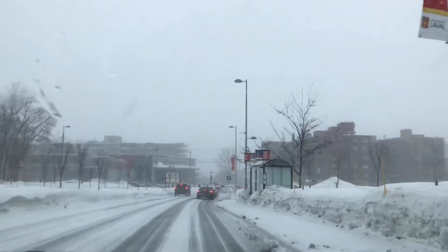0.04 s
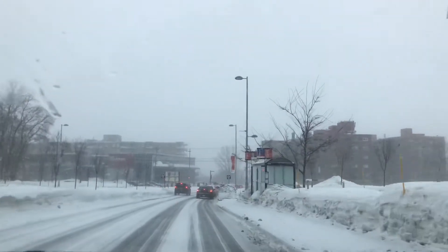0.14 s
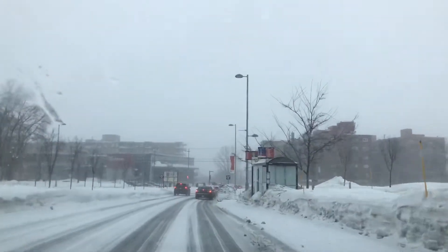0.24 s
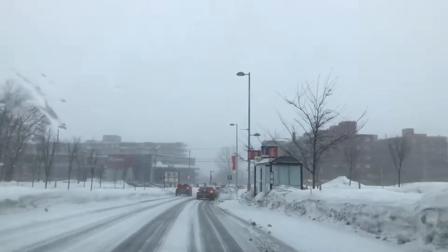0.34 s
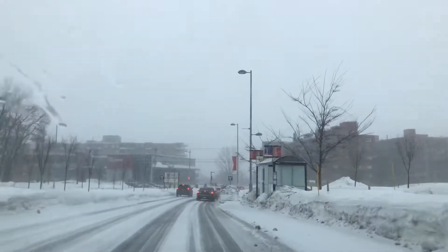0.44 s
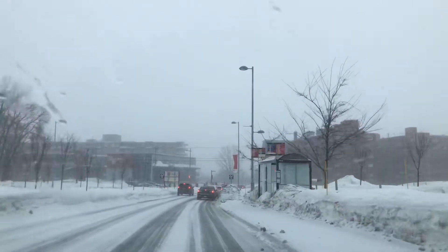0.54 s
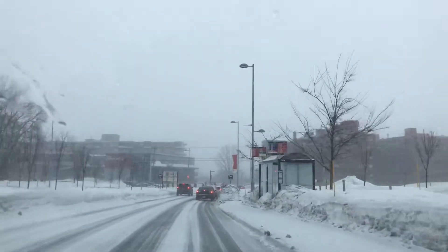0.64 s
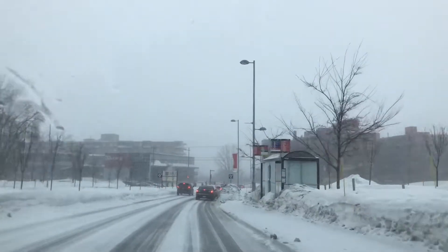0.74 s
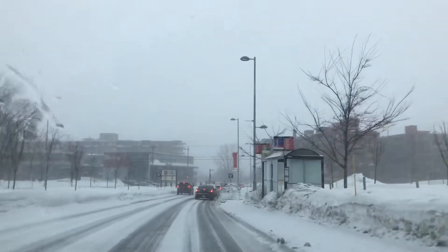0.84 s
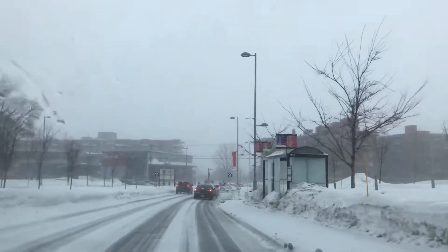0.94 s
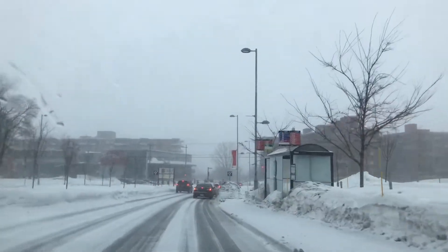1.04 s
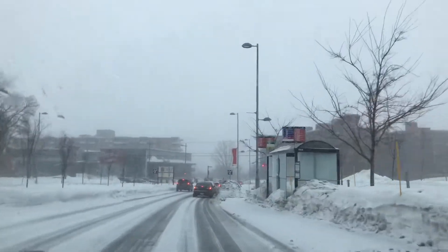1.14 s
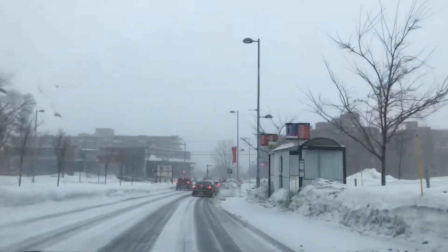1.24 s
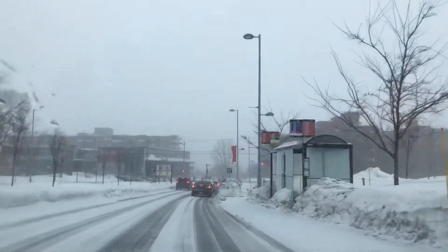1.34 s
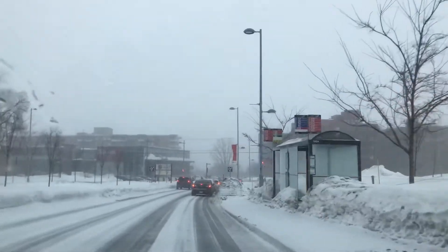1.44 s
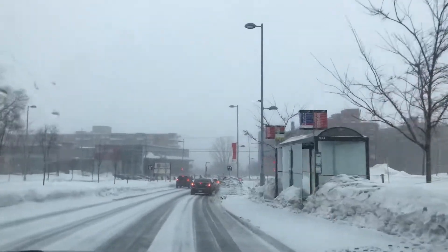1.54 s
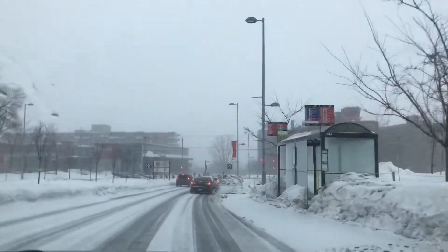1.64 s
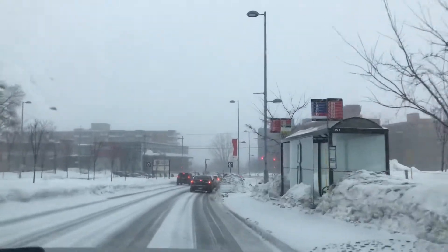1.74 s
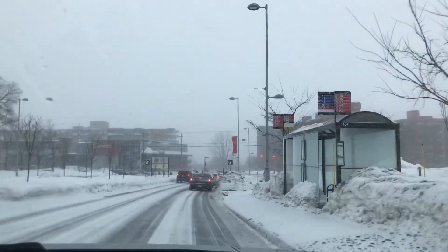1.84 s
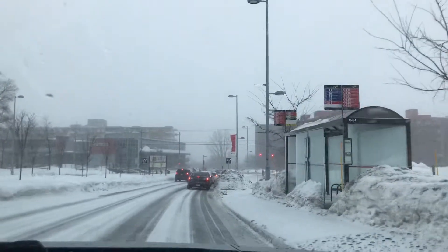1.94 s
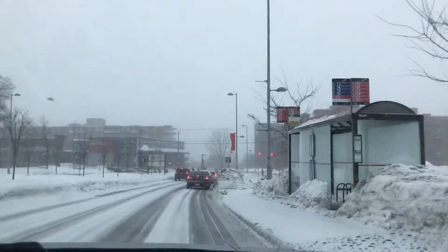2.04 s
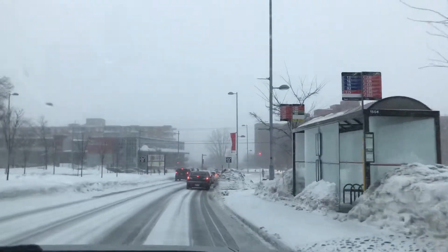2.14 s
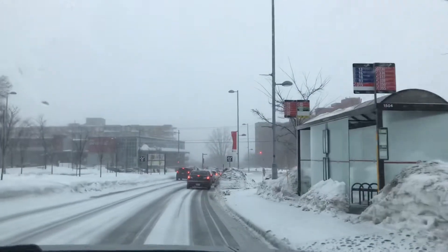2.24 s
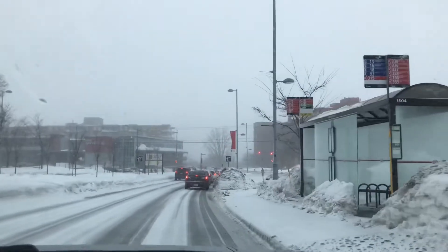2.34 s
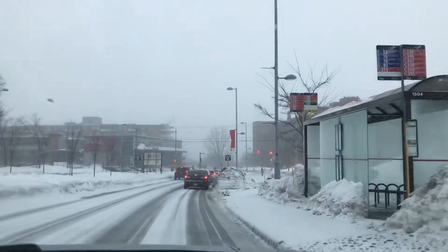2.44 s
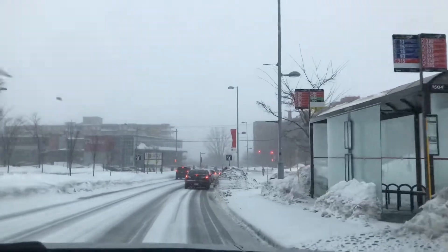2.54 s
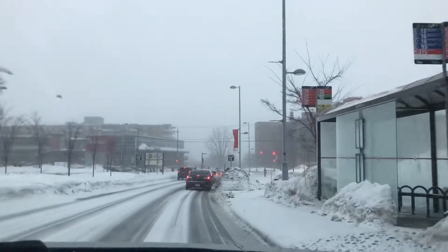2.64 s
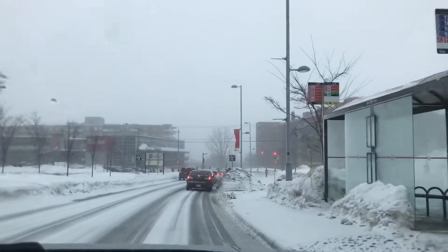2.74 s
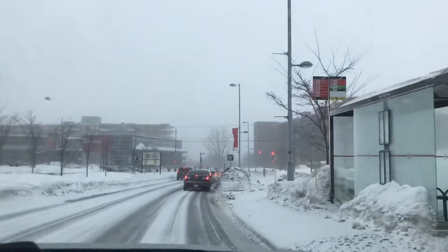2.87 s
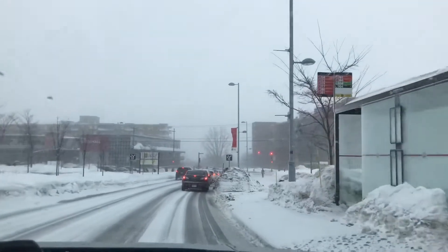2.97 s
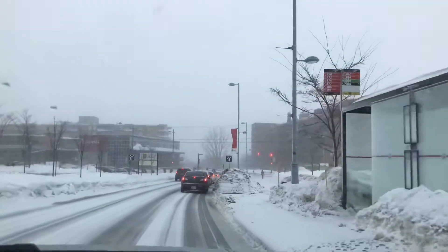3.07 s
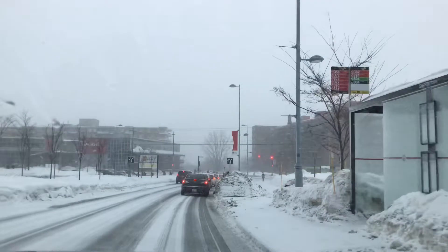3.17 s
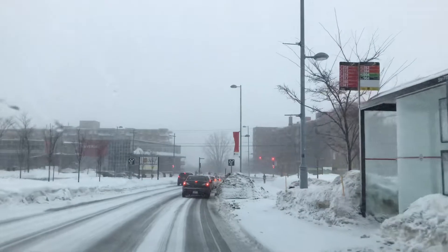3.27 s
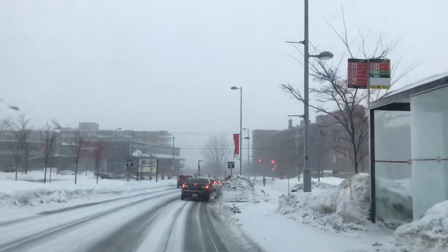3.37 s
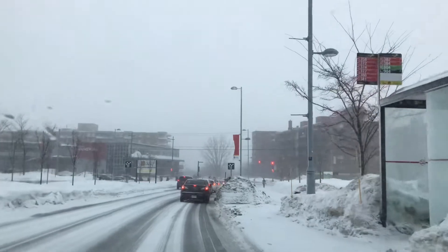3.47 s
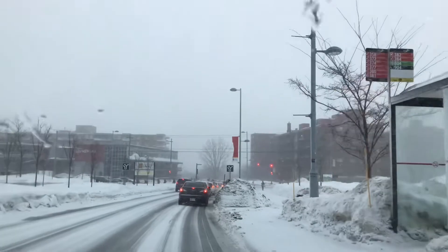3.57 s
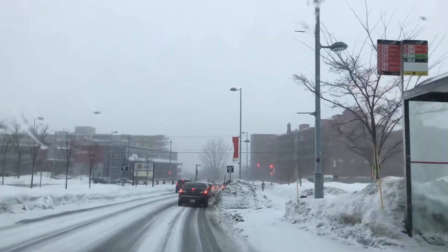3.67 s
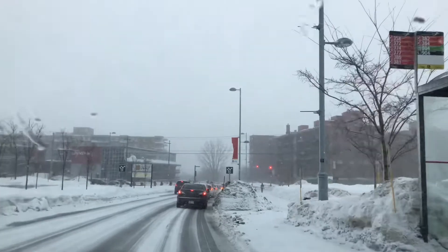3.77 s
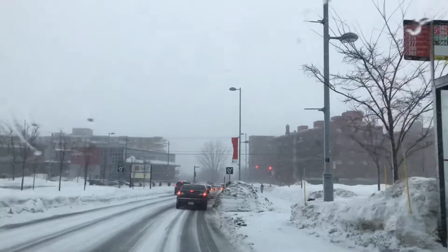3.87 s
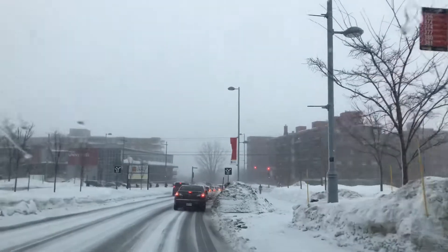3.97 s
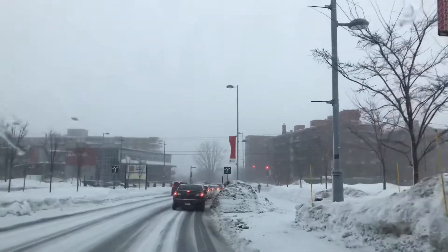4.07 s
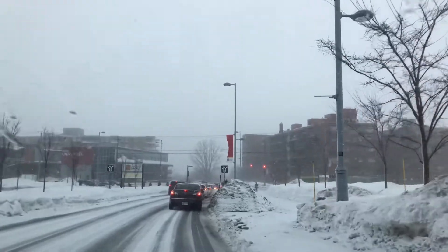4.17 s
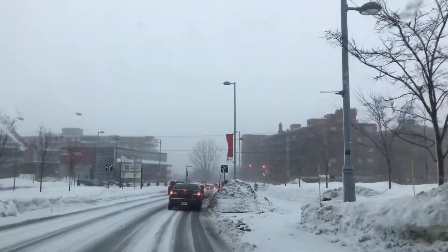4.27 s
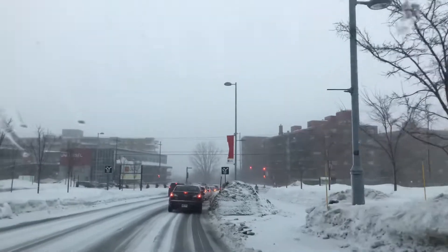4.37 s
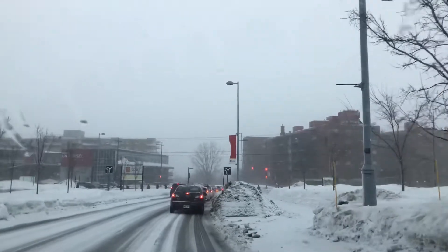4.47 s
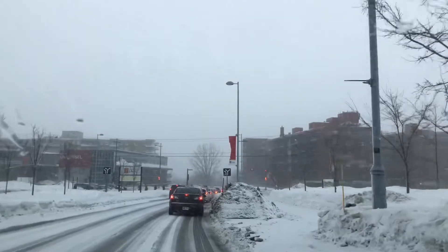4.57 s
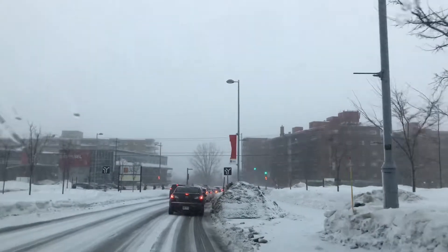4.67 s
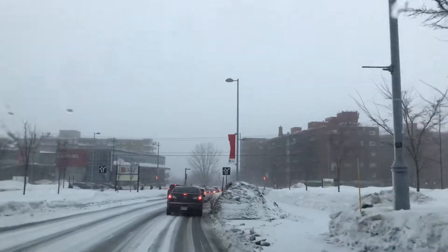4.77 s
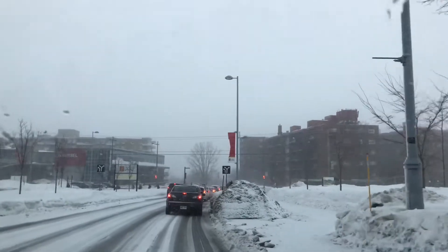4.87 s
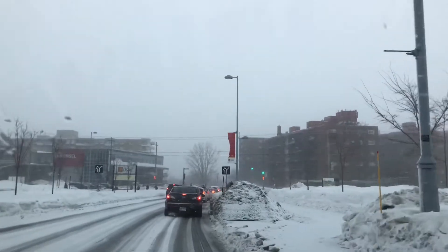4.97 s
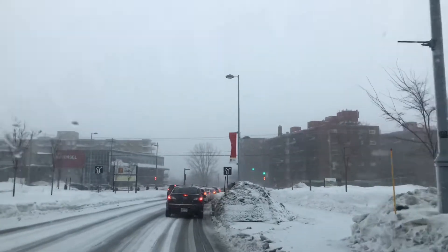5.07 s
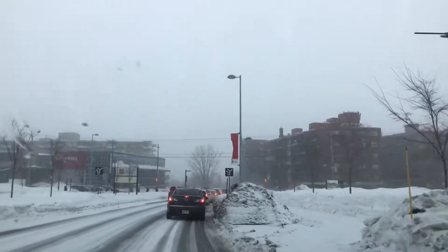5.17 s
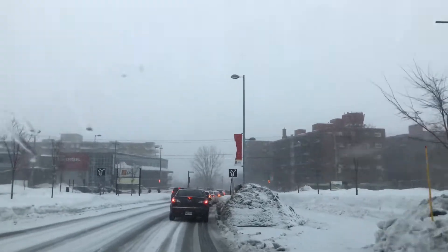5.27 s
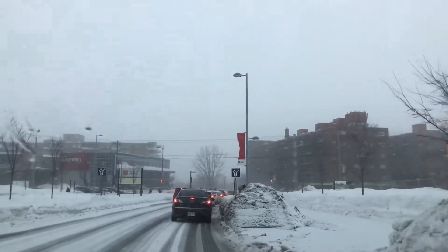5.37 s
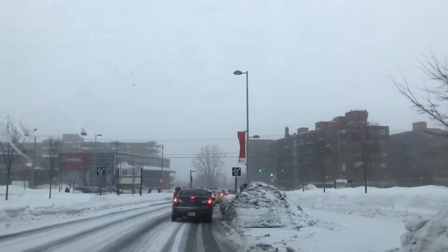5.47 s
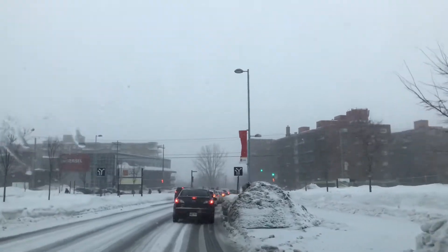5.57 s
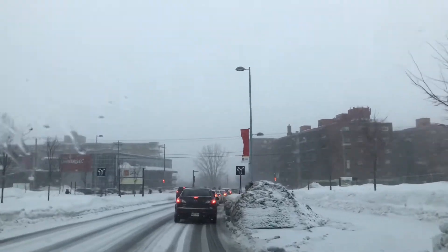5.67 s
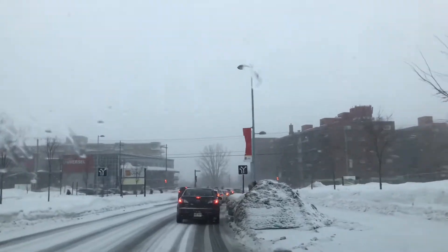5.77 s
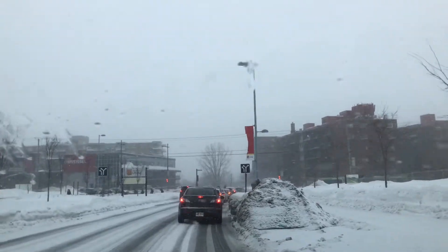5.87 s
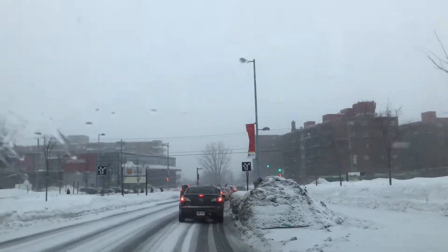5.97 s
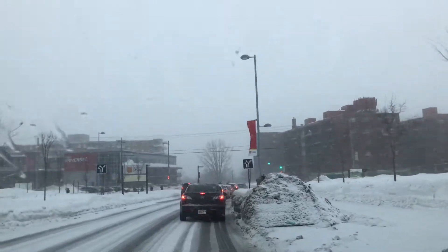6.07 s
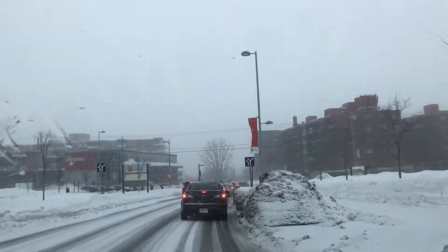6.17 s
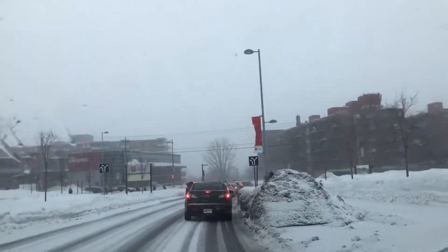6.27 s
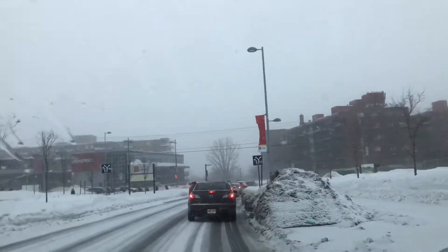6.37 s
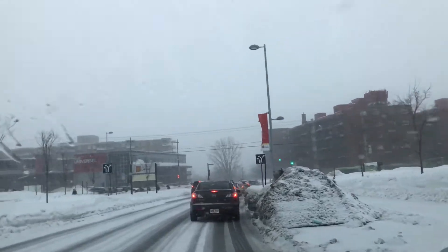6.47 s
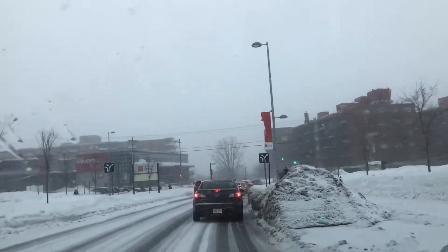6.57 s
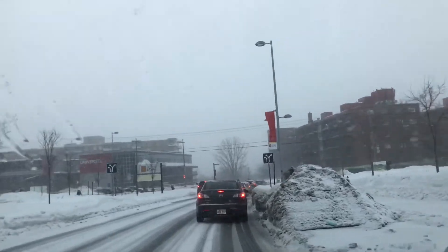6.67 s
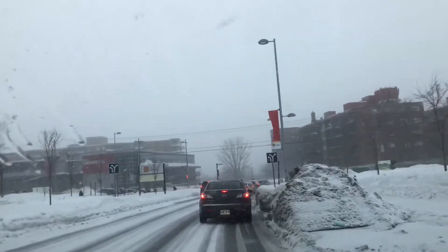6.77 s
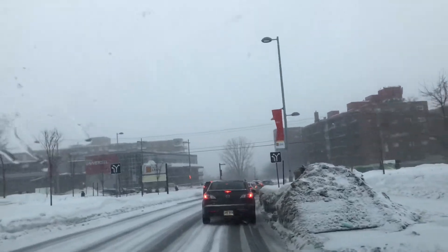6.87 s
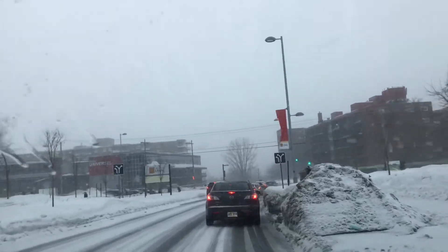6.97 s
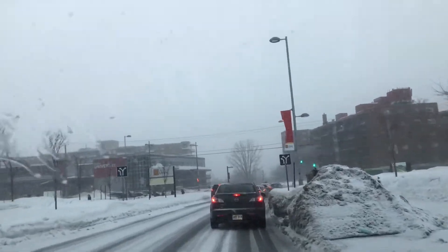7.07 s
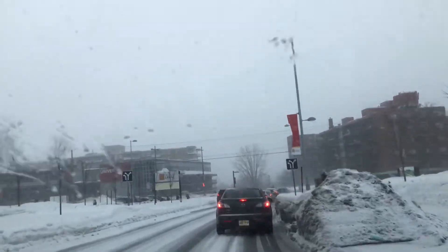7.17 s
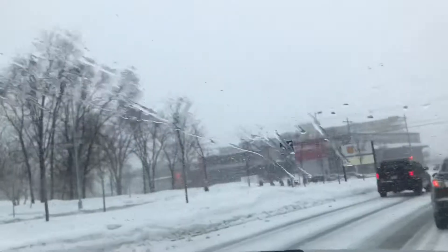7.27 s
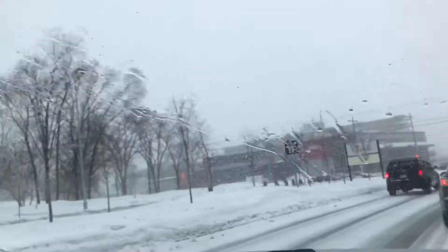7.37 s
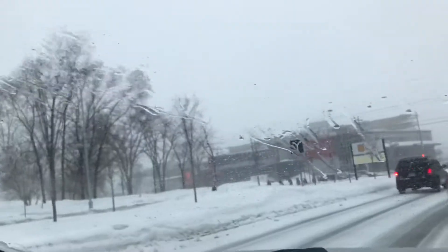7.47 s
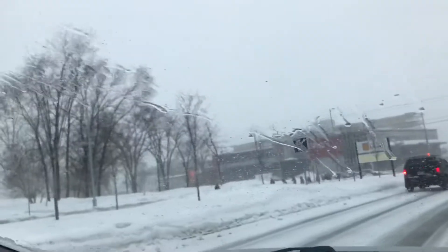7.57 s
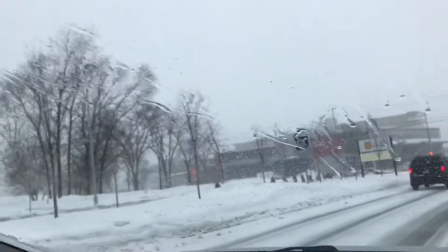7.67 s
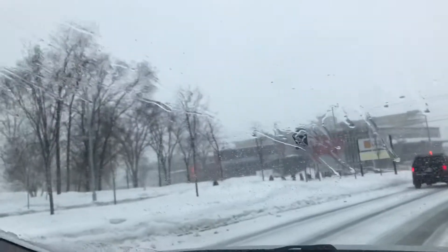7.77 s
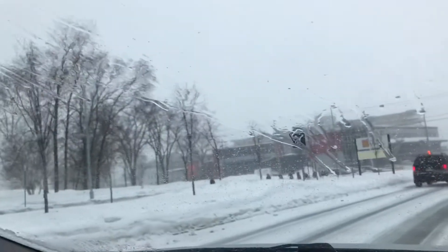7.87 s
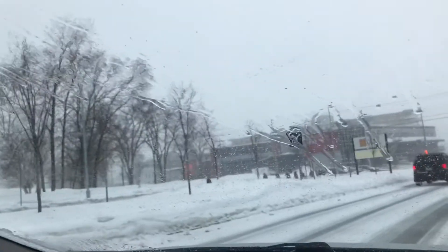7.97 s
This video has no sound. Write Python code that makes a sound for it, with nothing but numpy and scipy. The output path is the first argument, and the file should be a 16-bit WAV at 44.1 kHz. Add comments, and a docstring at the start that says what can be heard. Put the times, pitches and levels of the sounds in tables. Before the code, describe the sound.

Inside a closed car on a snowy street, close and dry, lasting about 8 seconds. From 0 s deep tyre rumble and cabin boom fill the low end, with a low engine hum, muted road roar, thin slush hiss and very faint vent air. From 0.2 s the turn-signal relay clicks about every 0.35 s, alternating a hard bright tick and softer tock. Dull low bumps shake the body, mostly between 1 and 4.5 s, as the rumble eases with slowing. Tiny scuffs dot the cabin; soft sleeve-like swishes come around 2.8-3.5 s and 5.2-5.6 s, then a fainter one until 6.1 s. At 7.3 s everything dips for an instant and breaks abruptly to creeping: low engine hum stands out over lighter road noise. Two clicks follow by 7.7 s, with brief scuffs and faint, wavering high squeaks around 7.7 and 7.95 s.

```python
"""A car rolls along a snowy street, slowing down: shaped noises make the tyres rumble and boom,
low sine tones make the engine, and a faint noise hisses for the air vents. From the start the turn-signal
relay ticks and tocks: struck, ringing resonances. Noise bursts scuff now and then; from about 3 s, longer
ones swish, perhaps a sleeve at the wheel. After an abrupt break at 7.3 s the car creeps:
the engine's hum stands out over lighter road noise, with faint squeaks from wavering tones."""
import sys
import numpy as np
from scipy import signal
from scipy.fft import rfft, irfft
from scipy.io import wavfile
from scipy.ndimage import uniform_filter1d, map_coordinates

SR = 44100
rng = np.random.default_rng(int(sys.argv[2]) if len(sys.argv) > 2 else 0)


def generate_wav(sig):
    """Save sig (samples, or channels by samples) to the path in sys.argv[1] as 16-bit PCM at SR."""
    pcm = np.round(np.clip(np.atleast_2d(sig).T, -1, 1) * 32767).astype(np.int16)
    wavfile.write(sys.argv[1], SR, pcm)


N = 353682
TIME = np.arange(N) / SR   # seconds

# body shaking on its springs: (frequency [Hz], relative level [dB per Hz])
SHAKE_SPECTRUM = [(20, -36.5), (30, -20), (40, 2), (52, 1), (62, 2.5), (72, 1), (84, -11.5), (110, -20)]
# low resonances of the cabin air: (frequency [Hz], width [Hz], relative level [dB])
BOOM_MODES = [(97.7, 14.2, 1), (112.1, 23.2, -3.5), (129.14, 16.5, 1.5), (157.2, 13.3, -5.5)]
# higher resonances of cabin air and tyre cavity: (frequency [Hz], width [Hz], relative level [dB])
CAVITY_MODES = [(195.4, 14.7, 1), (227.9, 6.3, 5), (256.9, 16.6, -4)]
# tread hum in the wheel wells: (frequency [Hz], width [Hz], relative level [dB])
TREAD_MODES = [(298.3, 34.5, -1.5), (322, 21, -1), (351.2, 28, -3), (399, 75, -12)]
# road roar under the tread: (frequency [Hz], relative level [dB per Hz])
ROAR_SPECTRUM = [(200, -16), (400, 0), (550, 1), (760, -3), (880, -1), (1100, -2), (1250, -4), (1400, -7.5),
                 (1750, -16), (2600, -32)]
# hiss of slush under the tyres: (frequency [Hz], relative level [dB per Hz])
SLUSH_SPECTRUM = [(900, -20.5), (1700, 1), (2150, -0.5), (2450, 1.5), (2900, -2.5), (4200, -9),
                  (5500, -16.5), (9000, -31.5)]
# the slush thins out: (time [s], hiss level [dB])
SLUSH_LEVEL = [(0, -62), (1.1, -69.5), (3.1, -68.5), (5.0, -67.5), (6.7, -69.5), (7.3, -67)]
# bumps in the packed snow: (time [s], body shake level [dB], cabin boom level [dB])
BUMPS = [(0.11, -36, -22.5), (0.55, -40, -25.5), (1.07, -19, -47), (1.4, -19.5, -36), (1.9, -21.5, -29.5),
         (2.12, -23, -43), (3.11, -24, -42), (3.28, -24, -43), (3.94, -22.5, -44), (4.42, -27, -28),
         (6.42, -37, -31), (6.6, -27, -34), (7.16, -22, -55)]
# cabin and wheel wells hum up for a stretch: (time [s], level [dB], half length [s], frequency [Hz])
HUMS = [(0.496, -32, 0.46, 131), (1.9, -30, .25, 128), (1.3, -50.5, .6, 342.6), (2.797, -34, 0.36, 135.4),
        (2.896, -54, .3, 341.8), (6.048, -34, 0.52, 129.2)]


def tyres():
    """Packed snow shakes the body, booms and hums in the cabin and roars under the tread."""
    bump_half_s = 0.028
    jolts = sum(from_db(shake_db) * swell(s, bump_half_s) for s, shake_db, _ in BUMPS)
    thuds = sum(from_db(boom_db) * swell(s, bump_half_s) for s, _, boom_db in BUMPS)
    # shake, boom, cavity and tread follow the car's speed; bumps add to shake and boom
    shake_gain = np.hypot(at_speed(first_db=-27.5, power=0.62), jolts)
    shake = shake_gain * evened(coloured(SHAKE_SPECTRUM), span_s=0.15)
    boom_gain = np.hypot(at_speed(first_db=-27, power=0.89), thuds)
    boom = boom_gain * evened(road_driven(BOOM_MODES), span_s=0.15)
    cavity = at_speed(first_db=-42.5, power=1.62) * evened(road_driven(CAVITY_MODES), span_s=0.25)
    tread = at_speed(first_db=-50, power=0.9) * evened(road_driven(TREAD_MODES), span_s=0.22)
    hums = 0
    for s, db, half_s, hz in HUMS:
        tone = evened(rough_tone(hz, flutter=22), span_s=0.13)
        hums = hums + from_db(db) * swell(s, half_s) * tone
    slush_db, = in_time(SLUSH_LEVEL)
    # the roar takes up about half of the slush's swing in level
    roar_db = -55.5 + 0.49 * (slush_db - slush_db.mean())
    roar = from_db(roar_db) * coloured(ROAR_SPECTRUM)
    slush = from_db(slush_db + 1.0 * drift(25)) * coloured(SLUSH_SPECTRUM)
    return shake + boom + cavity + tread + hums + roar + slush


def road_driven(modes):
    """The uneven snow shakes each resonance at random; rms 1."""
    total = 0
    for hz, width_hz, db in modes:
        push = rng.standard_normal(N + SR)
        total = total + from_db(db) * resonate(push, hz, width_hz)[SR:]   # drop the first second's build-up
    return rms_one(total)


# the car slows: (time [s], share of its first speed)
SPEED = [(0, 1), (2.05, 0.91), (3.5, 0.66), (4.9, 0.56), (6.55, .53), (7.3, .33)]


def at_speed(first_db, power):
    """Gain of a sound that grows as a power of the car's speed, from its level at first speed."""
    speed, = in_time(SPEED)
    return from_db(first_db) * np.maximum(speed, 1e-3) ** power


# tones of the engine: (multiple of firing rate, relative level [dB])
ENGINE_ORDERS = [(1, 16.5), (1.5, -24), (2, -28), (2.5, -9)]


def engine(firing_hz, waver, uneven_db):
    """Low orders of the firing rate, a little unsteady in speed and strength; rms 1."""
    turns = np.cumsum(firing_hz * (1 + waver * drift(12))) / SR
    total = 0
    for multiple, db in ENGINE_ORDERS:
        tone = np.sin(2 * np.pi * (multiple * turns + rng.random()))
        total = total + from_db(db + uneven_db * drift(12)) * tone
    return rms_one(total)


# light road noise while creeping: (frequency [Hz], relative level [dB per Hz])
CREEP_SPECTRUM = [(20, 2), (70, 5.5), (120, 4.5), (180, -5.5), (320, -8.5), (430, -14.5), (560, -15),
                  (760, -21), (1050, -15.5), (1550, -22.5), (2000, -30), (3800, -40), (5500, -45),
                  (12000, -58)]
# the engine's hum while creeping: (time [s], level [dB])
CREEP_HUM_LEVEL = [(7.3, -36.5), (7.55, -40.5), (7.83, -35), (7.9, -46), (8.02, -42)]
# faint squeaks: (time [s], level [dB], half length [s], frequency [Hz], glide [Hz per s])
SQUEAKS = [(7.67, -65, 0.039, 3470, 98), (7.718, -59, 0.0081, 3640, 1499), (7.89, -72, .04, 4500, 1),
           (7.97, -65.5, 0.045, 3750, -1200)]


def creeping():
    """At walking pace the engine hums over a lighter road noise and a faint scratchy squeak."""
    # the road noise grows by 3 dB per second as the car gathers way
    road_db = -42 + 3.0 * np.maximum(TIME - BREAK_S, 0)
    road = from_db(road_db) * coloured(CREEP_SPECTRUM)
    hum_db, = in_time(CREEP_HUM_LEVEL)
    hum = from_db(hum_db) * engine(firing_hz=50, waver=0.0093, uneven_db=1)
    squeak = gliding(SQUEAKS, flutter=380) + from_db(-9) * gliding(SQUEAKS, flutter=290, multiple=1.2)
    slips = rms_one(from_db(3.3 * np.clip(drift(140), -2, 2)))   # the rub catches and lets go
    return road + hum + slips * squeak


# stretches of clicking: (first tick [s], last flip [s])
BLINKING = [(0.2032, 7.21), (7.3545, 7.72)]


def flips():
    """Times of ticks and tocks: each flip falls on the nearest timer step, so the beat limps a little."""
    timer_step_s, steps_per_flip = 0.040011, 8.75
    ticks, tocks = [], []
    for first_s, last_s in BLINKING:
        beats = np.arange(round((last_s - first_s) / (timer_step_s * steps_per_flip)) + 1)
        times = first_s + timer_step_s * np.floor(beats * steps_per_flip + 0.5)
        ticks.extend(times[::2])
        tocks.extend(times[1::2])
    return ticks, tocks


# ringing of the relay case, levels relative:
# (frequency [Hz], width [Hz], level pulling in [dB], level letting go [dB])
RELAY_MODES = [(1200, 460, -15, -34), (2290, 490, -12, -22), (2630, 250, -16, -9), (2980, 180, -9, -17),
               (3385, 230, -17.5, -8.5), (3780, 80, -7.5, -14), (4300, 430, -9, -24), (4790, 190, -4.5, -8),
               (4995, 180, -2.5, -8), (5730, 140, -16, -17), (5756, 105, -3.5, 5), (5980, 210, 5, -4),
               (6080, 150, -10.5, 4.5), (6330, 120, -1, -10), (6870, 240, -7.5, -18), (8260, 150, -15, -24),
               (8700, 520, -32, -18), (11880, 330, -19.5, -18), (14800, 500, -26, -30),
               (15550, 360, -28, -21)]


def indicator():
    """The relay gives a hard tick pulling in and a softer tock letting go."""
    _, _, pull_db, release_db = np.transpose(RELAY_MODES)
    ticks, tocks = flips()
    tick = relay(ticks, pull_db, level_db=-50, bounce_s=0.0044, bounce=0.47, crack_db=-19)
    tock = relay(tocks, release_db, level_db=-54.5, bounce_s=0.00355, bounce=0.9, crack_db=-21)
    return tick + tock


def relay(times, mode_db, level_db, bounce_s, bounce, crack_db):
    """The armature strikes and bounces; the case rings and the dashboard scatters the click."""
    scatter, scatter_s = 0.085, 0.0072   # strength beside the strike, and its fading time
    t = np.arange(SR // 16) / SR
    strike = int(0.0012 * SR)   # the armature slides for this long before it strikes
    dashboard = rng.standard_normal(len(t))   # the same short echoes follow every click of this kind
    out = np.zeros(N + len(t))
    for s in times:
        echoes = 1.3 * dashboard + rng.standard_normal(len(t))
        force = scatter * echoes * np.exp(-t / scatter_s)
        force[strike] += 1
        this_bounce_s = bounce_s * (1 + 0.004 * rng.uniform(-1, 1))
        force[strike + int(this_bounce_s * SR)] += bounce
        # the dry snap of the contact
        click = from_db(crack_db) * resonate(force, hz=5200, width_hz=2400)
        # each click differs a little in colour and in strength
        mode_gains = from_db(mode_db - 0.47 * rng.standard_normal(len(RELAY_MODES)))
        for (hz, width_hz, *_), gain in zip(RELAY_MODES, mode_gains):
            click = click + gain * resonate(force, hz, width_hz)
        strength = from_db(level_db - 0.25 * rng.standard_normal())
        start = int(s * SR) - strike
        out[start:start + len(t)] += strength * rms_one(click)
    return out[:N]


# colour of the soft rubbing: (frequency [Hz], relative level [dB per Hz])
RUSTLE_SPECTRUM = [(1200, 1), (2500, 1), (4200, 0), (6500, 1), (7700, -1.5), (9400, -2), (10400, -7.5),
                   (11600, -3.5), (16000, -9.5)]
# soft swishes: (start time [s], length [s], level [dB])
SWISHES = [(2.78, .77, -65), (5.198, 0.45, -63.5), (5.66, .48, -72.5)]
# short scuffs in the cabin: (time [s], level [dB], half length [s])
SCUFFS = [(0.407, -70, .004), (0.62, -73, 0.0036), (2.034, -67, .005), (2.962, -60, 0.0089),
          (3.766, -68, .006), (4.343, -68.5, 0.055), (4.898, -61, .009), (5.278, -66, .025),
          (7.638, -60, .006), (7.665, -55, 0.0066), (7.935, -80, 0.067), (7.996, -56, 0.0094)]


def rustle():
    """Soft rubbing: long swishes and short scuffs of noise, with a fine uneven grain."""
    swishes = sum(from_db(db) * swish(s, length_s) for s, length_s, db in SWISHES)
    scuffs = sum(from_db(db) * swell(s, half_s) for s, db, half_s in SCUFFS)
    grain = from_db(1.0 * drift(22) + 0.48 * drift(310))
    return (swishes + scuffs) * grain * coloured(RUSTLE_SPECTRUM)


def swish(start_s, length_s):
    """Loudness of one stroke: a quick attack, a slowly sagging hold and a release."""
    attack_s, sag_db_per_s, release_s = 0.037, 4, 0.06
    t = TIME - start_s
    attack = np.clip(t / attack_s, 0, 1)
    hold = from_db(-sag_db_per_s * np.clip(t, 0, length_s))
    release = np.exp(-np.maximum(t - length_s, 0) / release_s)
    return attack * hold * release


# thin whines that swell and fade: (time [s], level [dB], half length [s], frequency [Hz], glide [Hz per s])
WHINES = [(2.25, -82, .03, 13950, 2), (2.45, -82, .03, 14000, 0), (2.5, -84, .5, 9170, -130),
          (6.45, -80, 0.22, 9420, -300)]


def whines():
    """Thin, unsteady machinery tones: one fades as the car slows, the others come and go."""
    # perhaps the fuel pump
    pump = at_speed(first_db=-83.5, power=2.1) * rough_tone(hz=5250, flutter=200)
    return pump + gliding(WHINES, flutter=330)


# hiss of the vents: (frequency [Hz], relative level [dB per Hz])
AIR_SPECTRUM = [(2000, -18), (4300, 1.5), (4800, -7), (5300, 0.5), (5700, 0.5), (6700, 0), (7300, -2.5),
                (7900, -4), (8300, 2.5), (9600, 0), (10400, -6.5), (11600, -2.5), (16000, -4.5)]


def vents():
    """Air hisses from the vents as faint noise whose level drifts slowly."""
    return from_db(-73.5 + 0.5 * drift(1.6)) * coloured(AIR_SPECTRUM)


def from_db(db):
    """Decibels to gain."""
    return 10 ** (np.asarray(db) / 20)


def rms_one(x):
    """Scale to an average strength (rms) of 1."""
    return x / np.sqrt(np.mean(x ** 2) + 1e-20)


def in_time(rows):
    """Each column of a curve, joined by straight lines, at every sample."""
    s, *columns = np.transpose(rows)
    return [np.interp(TIME, s, column) for column in columns]


def coloured(spectrum):
    """Noise of the given spectrum, falling away steeply past its ends; rms 1."""
    log_hz = np.log2(np.maximum(np.fft.rfftfreq(N, 1 / SR), 1))
    hz, db = np.transpose(spectrum)
    knots = np.log2(hz)
    octaves_outside = np.abs(log_hz - np.clip(log_hz, knots[0], knots[-1]))
    gain = from_db(np.interp(log_hz, knots, db) - 30 * octaves_outside)
    return rms_one(irfft(rfft(rng.standard_normal(N)) * gain, N))


def drift(rate):
    """A smooth random curve through this many random points a second; spread about 1."""
    knots = rng.standard_normal(N // 40)
    return map_coordinates(knots, [TIME * rate + 2], order=3, mode="wrap")


def resonate(x, hz, width_hz):
    """A steep-sided resonance: the same two-pole filter twice over, gain about 1 on top."""
    r = np.exp(-np.pi * 1.5 * width_hz / SR)   # each pass is wider, so that both together fit the width
    section = [(1 - r * r) / 2, 0, (r * r - 1) / 2, 1, -2 * r * np.cos(2 * np.pi * hz / SR), r * r]
    return signal.sosfilt([section, section], x + 1e-18)


def evened(x, span_s):
    """Hold a noise near rms 1 over the given span, keeping its faster flutter."""
    power = uniform_filter1d(x ** 2, max(int(span_s * SR), 1))
    return x / np.sqrt(power + 1e-12)


def swell(s, half_s):
    """A smooth bell-shaped rise and fall around a moment; 1 on top."""
    return np.exp(-((TIME - s) / half_s) ** 2 / 2)


def rough_tone(hz, flutter):
    """A tone whose strength and phase flutter at about this many turns a second; rms 1."""
    angle = 2 * np.pi * np.cumsum(hz * np.ones(N)) / SR
    return rms_one(drift(flutter) * np.sin(angle) + drift(flutter) * np.cos(angle))


def gliding(rows, flutter, multiple=1):
    """Rough tones that each swell, glide in pitch and fade."""
    total = 0
    for s, db, half_s, hz, glide in rows:
        tone = rough_tone(multiple * (hz + glide * (TIME - s)), flutter)
        total = total + from_db(db) * swell(s, half_s) * tone
    return total


BREAK_S, BREAK_WIDTH_S, BREAK_DB = 7.304, 0.011, -24   # moment, width and depth of the dip


def scene():
    """The rolling car gives way to the creeping one; everything dips briefly at the break."""
    later = np.clip((TIME - BREAK_S) / BREAK_WIDTH_S + 0.5, 0, 1)
    cruise = from_db(-39) * engine(firing_hz=50.4, waver=0.032, uneven_db=2.5)
    rolling = tyres() + cruise + whines()
    car = (1 - later) * rolling + later * creeping()
    cabin = car + indicator() + rustle() + vents()
    dip = from_db(BREAK_DB * np.exp(-np.abs(TIME - BREAK_S) / BREAK_WIDTH_S))
    return (cabin * dip)[None]


def record(dry):
    """The sound opens smoothly over 4 ms and the treble above 15720 Hz is cut steeply."""
    opening = np.minimum(TIME / 0.004, 1)
    treble_cut = signal.ellip(12, 0.1, 90, 15720, fs=SR, output="sos")
    return signal.sosfilt(treble_cut, dry * opening)


dry = scene()
out = record(dry)
generate_wav(out)
```